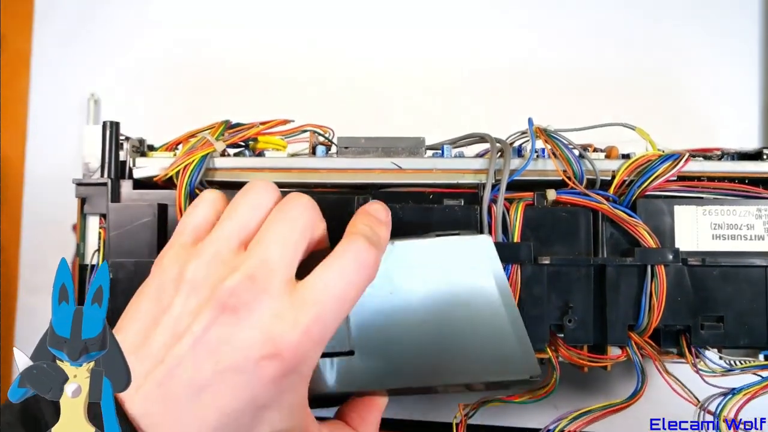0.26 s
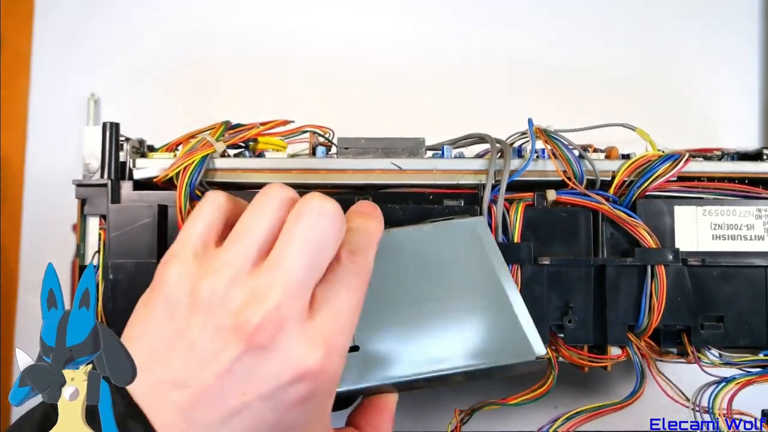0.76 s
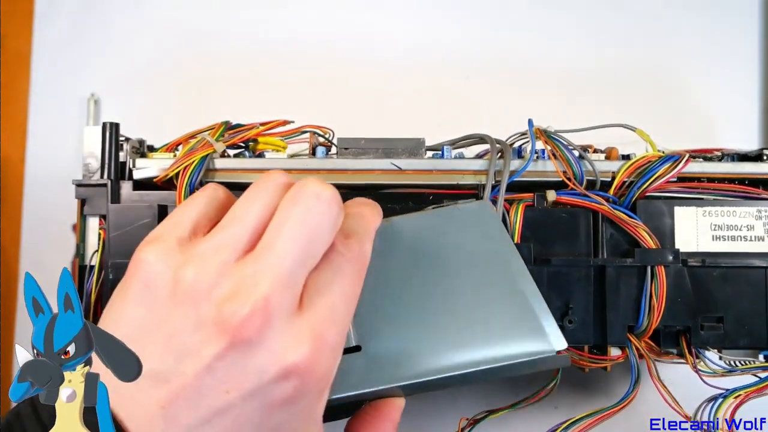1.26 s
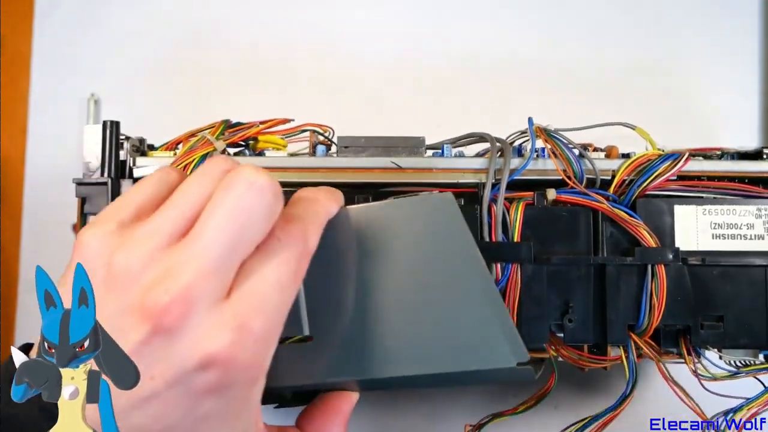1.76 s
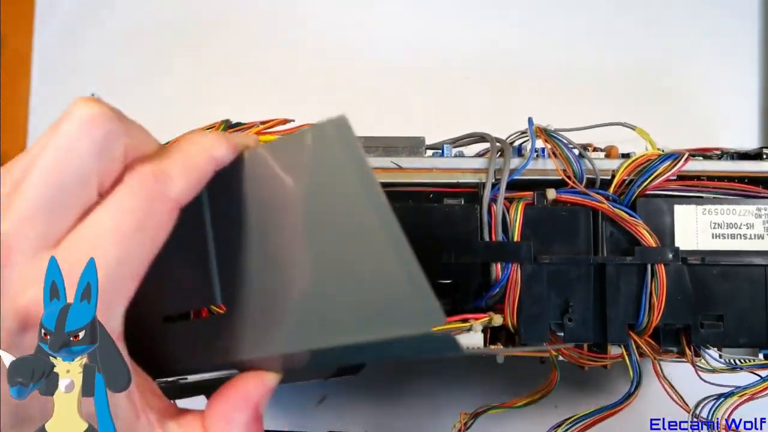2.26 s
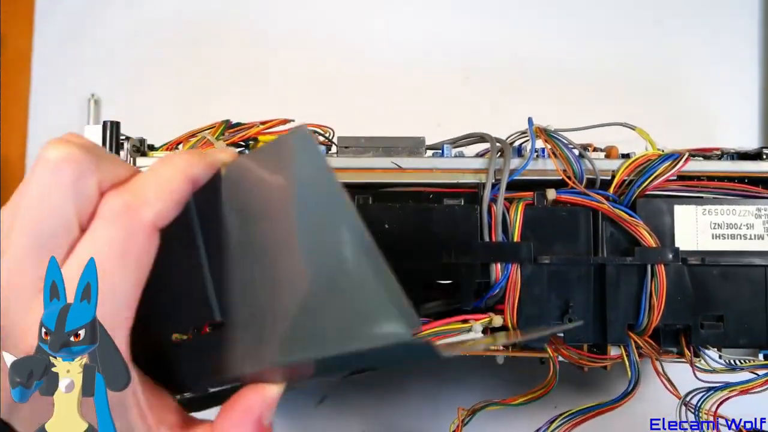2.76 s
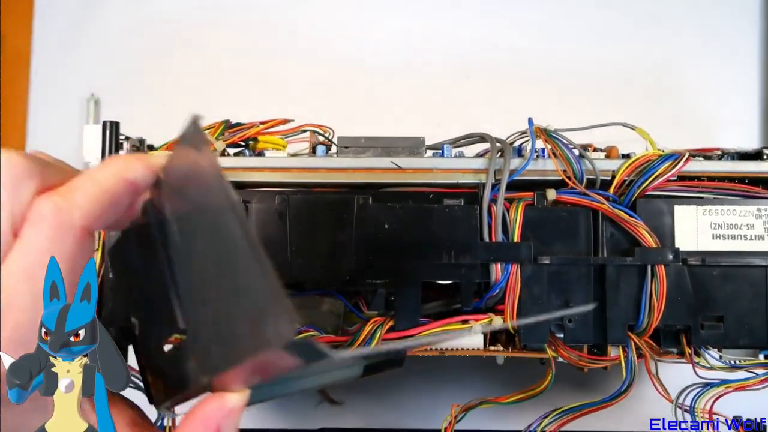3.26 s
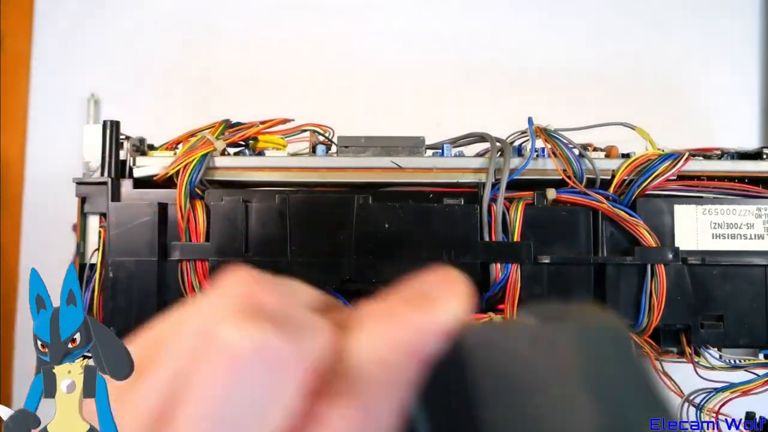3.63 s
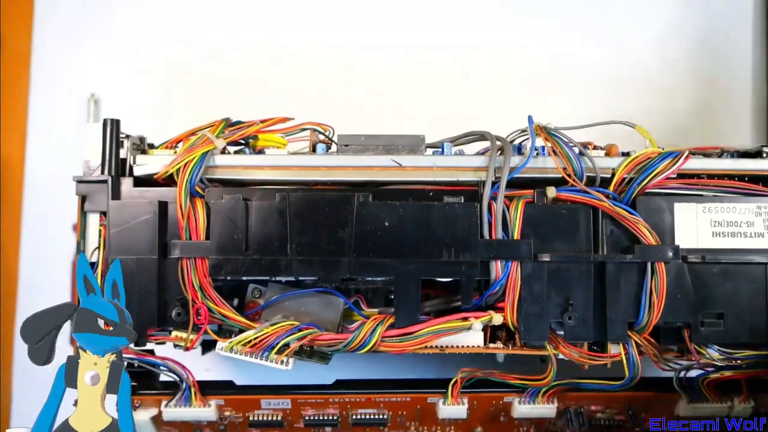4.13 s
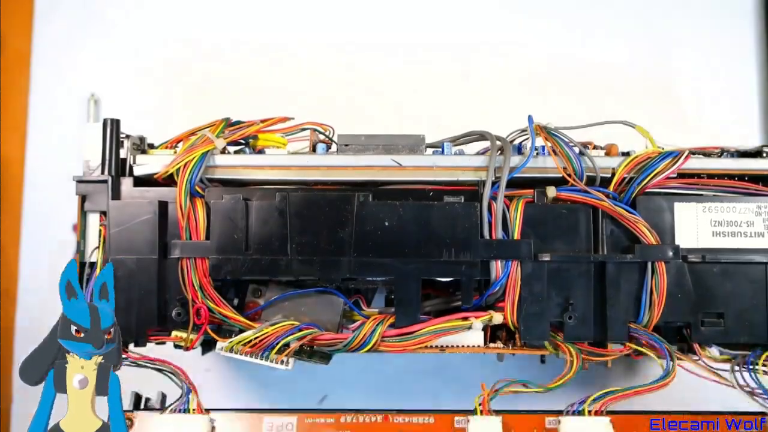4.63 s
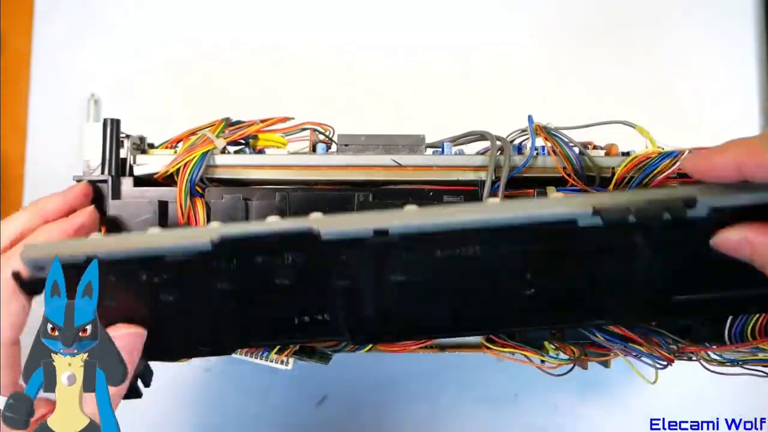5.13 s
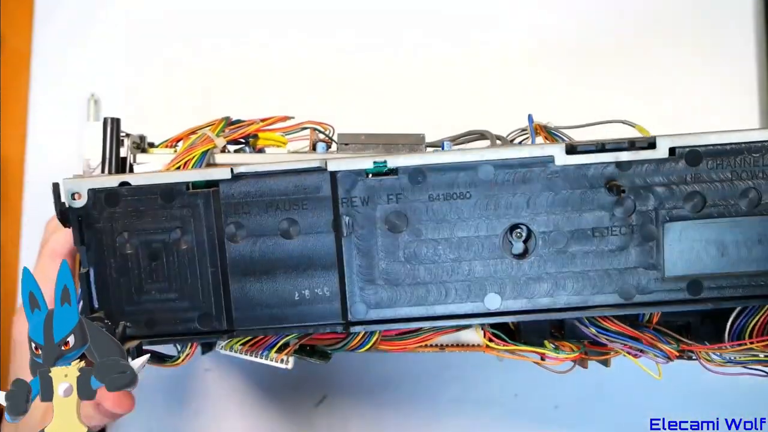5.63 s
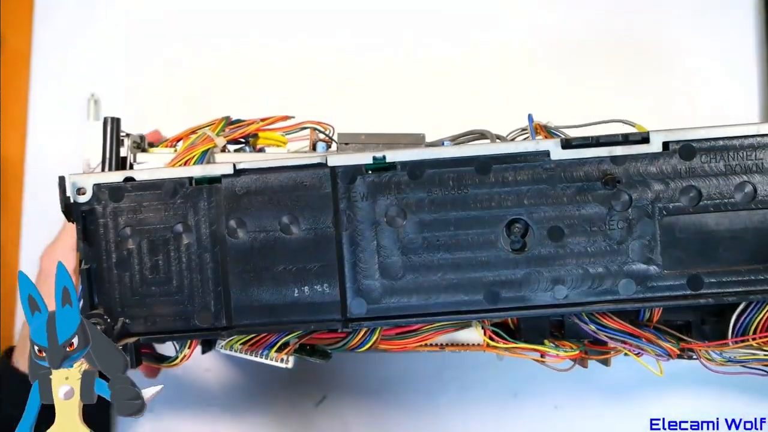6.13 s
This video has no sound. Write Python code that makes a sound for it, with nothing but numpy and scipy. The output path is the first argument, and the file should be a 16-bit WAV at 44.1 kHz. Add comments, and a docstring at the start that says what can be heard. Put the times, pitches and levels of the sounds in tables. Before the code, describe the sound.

Close stereo pickup in a small quiet room. Hard hollow plastic knocks and dry rubbing come in uneven clusters, with low bumps of the chassis on the table. They thin to faint ticks, then a metal cover pulls free with a bright short ring. After a brief lull it scrapes and clatters loudly over the table, followed by soft plastic knocks and a faint metallic tinkle.

```python
"""Plastic parts knock and rub from the start: a hand works a metal cover off a plastic chassis.
The cover drags free with a ring, is set down and slid over the table; a plastic panel is swung up.
Knocks: band-noise bursts plus shell and rib modes. Cover: impulses or friction driving sheet modes.
Rubs and scrapes: random slips shaping noise. Chassis: low modes. Room tail and faint air noise
surround it; a noise gate lowers the pauses."""
import sys
import numpy as np
from scipy import signal
from scipy.fft import rfft, irfft, next_fast_len
from scipy.io import wavfile
from scipy.ndimage import uniform_filter1d, minimum_filter1d, map_coordinates

SR = 44100
rng = np.random.default_rng(int(sys.argv[2]) if len(sys.argv) > 2 else 0)


def persist_wave(psi):
    """Save psi, clipped to +-1, as 16-bit WAV."""
    counts = np.round(np.clip(psi, -1, 1) * 32767).astype(np.int16)
    wavfile.write(sys.argv[1], SR, np.atleast_2d(counts).T)


N = 281754
TIME_S = np.arange(N) / SR

# quiet air spectrum: hz, relative_db
AIR_SPECTRUM = [(15, -33), (30, -11), (55, -3), (110, -11.5), (210, -9.5), (350, -9.5), (550, -14),
                (950, -16), (1800, -18), (2200, -17.5), (3200, -22), (6000, -29), (10000, -34.5),
                (16000, -50.5)]
# room decay: hz, t60_s
ROOM_DECAY = [(100, 0.21), (300, 0.34), (800, 0.22), (2000, 0.25), (5000, 0.15), (14000, 0.16)]
# likeness of noise at the two microphones: hz, correlation (0-1)
MIC_LIKENESS = [(50, .95), (250, .95), (1000, .8), (2500, .35), (8000, .45)]
# stereo balance: hz, left_minus_right_db
MIC_BALANCE = [(30, -7.5), (70, -9), (180, -1), (500, -0.5), (1200, -1.5), (4000, -3.5), (12000, -0.5)]
# position of the hand: time_s, left_lag_ms
HAND_LAG = [(0, 0), (1.5, 0), (1.8, -.1), (3.3, -.09), (4.0, .25), (4.8, .23), (5.1, .15), (5.45, .14),
            (5.6, 0)]
# low modes of the chassis on the table, before random detuning: hz, relative_db, t60_s
CHASSIS_MODES = [(54, -1, 0.13), (85.2, -16.5, 0.099), (106.2, -0.5, 0.25), (129, -3, 0.14), (178, 1, 0.1)]
# chassis rocking on the table: start_s, strength_db
CHASSIS_BUMPS = [(0.023, -14), (0.21, -4.5), (0.414, -1.5), (0.55, -3.5), (0.891, -20.5), (1.632, -13),
                 (2.187, -7), (2.655, -13.5), (2.898, -8), (3.233, -10.5), (3.523, -12.5), (4.089, -8),
                 (4.284, -8), (4.447, -5.5), (5.181, -7), (5.533, -13), (6.093, -17.5), (6.168, -12)]
# plastic rubbing under the hand: start_s, length_s, level_db, rumble_db (re level)
RUB_STROKES = [(0.0, .33, -39, -4.5), (0.41, .17, -36, 1), (0.795, 0.2, -35.5, -3),
               (1.154, 0.12, -42.5, -3.5), (1.561, 0.46, -40.5, -7), (2.37, 0.1, -32, -10),
               (2.66, .26, -44.5, -6), (3.521, 0.071, -51.5, -0.5), (4.476, .08, -38.5, -10),
               (4.695, 0.3, -40, -9), (5.025, 0.2, -35.5, -10), (5.452, 0.18, -44, -2),
               (5.74, .34, -63, -6.5), (6.09, .14, -46.5, -7)]
# rubbing spectrum: hz, relative_db
RUB_SPECTRUM = [(15, -36.5), (40, -7), (90, -6), (180, -7), (350, -9), (650, -8.5), (1020, -2),
                (1500, -8.5), (2500, -12.5), (5000, -20.5), (8000, -26.5), (11500, -36.5), (16000, -45)]
# shell modes excited by rubbing: hz, relative_db, t60_s
RUBBED_SHELL_MODES = [(954, 6, 0.018), (1077, -6.5, 0.08), (1103, -19.0, 0.012)]
# cover edge dragged out of the chassis: start_s, length_s, level_db, rumble_db, hiss_db (both re level)
PULL_STROKE = (2.945, .145, -34, -6, 5)
# cover pushed over the table, then nudged: start_s, length_s, level_db, rumble_db, hiss_db (both re level)
SLIDE_STROKES = [(4.014, .305, -19.5, -5, -11.5), (4.42, .14, -36, -8, -12)]
# metal scraping spectrum: hz, relative_db
SCRAPE_SPECTRUM = [(15, -39), (35, -25.5), (55, 4), (85, -9.5), (140, -19), (350, -7), (600, -14),
                   (1280, -10.5), (2060, -17), (4000, -16), (8000, -22.5), (12000, -32), (16000, -53)]
# drive of the sheet by its sharp edge: hz, gain_db
EDGE_DRIVE = [(350, -6.0), (1500, -4), (5000, 12.5)]
# small metal part in the panel: hz, relative_db, t60_s
TINKLE_MODES = [(3330, -7, .35), (5700, -3, .35), (5790, 0, .45), (5870, -1, .4), (6010, -3, .35)]
# knocks that set it ringing: start_s, level_db
TINKLE_HITS = [(5.126, -15), (5.421, -13)]
# cover held in the hand: hz, relative_db, t60_s
HELD_MODES = [(320.3, -4, 0.51), (433, -14, 0.37), (1070, -6.5, 0.28), (1334, 1.5, 0.083),
              (1750, -15, 0.069), (2173, 8, 0.23), (2286, 1, 0.2), (2400, -5, .23), (2767, 3.5, 0.23),
              (3400, 5.5, .08), (4530, 11, 0.05), (6360, 6, .12), (6800, -9, 0.15), (7300, -12.5, .16)]
# cover lying on the table: hz, relative_db, t60_s
LAID_MODES = [(258, -6.5, 0.068), (284, -9.5, 0.14), (344, -6.5, 0.98), (379, -10, 0.119),
              (442.4, -3.5, 0.42), (419, -3, 0.068), (564.4, -8, 0.26), (703, -4, 0.1), (810, -1.5, .12),
              (980, -1.5, 0.14), (1258, 5, 0.1), (1380, 1.5, 0.11), (1730, -6, 0.2), (1980, -7.5, 0.4),
              (2416, -3.5, 0.17), (2931, -9.5, 0.27), (3180, -11.5, .22), (3960, -22, .22),
              (4100, -16, 0.16), (5000, -17.5, .22), (5250, -11.5, 0.223)]
# blows on the cover: start_s, strength_db, weight_db (low tilt), snap_db (high tilt)
COVER_BLOWS = [(2.994, -9.5, -3, 4), (3.006, -12.5, -0.5, -9), (3.025, -13, -4, 11.5), (3.053, -26, -1, 2),
               (3.074, -19, 3, 10), (3.232, -17.5, -0.5, 13.5), (3.245, -19, 4.5, 2.5),
               (3.895, -20, 8.5, -1), (4.011, -5, -9, -3), (4.046, -5, 4, 5.5), (4.089, -6, 9.5, -15.5),
               (4.141, -2.5, -3.5, 2), (4.176, -0.5, -6, 0), (4.197, -1.5, 3, 1),
               (4.283, -12.5, 15.5, -0.5), (4.306, -4, -10, 4.5), (4.414, -6, -10, -5),
               (4.449, -10, 10, -14), (4.498, -17, -10, 2.5), (4.554, -18.5, -19, 0.5)]
# plastic knocks: start_s, strength_db, weight_db (low tilt), snap_db (high tilt), shell_hz, t60_s (burst, at 1 kHz)
PLASTIC_KNOCKS = [(0.022, -12.5, -3.5, -1.5, 1356, 0.052), (0.084, -21.5, -7, 4, 945, 0.038),
                  (0.202, -12.0, -5, -0.5, 1510, 0.12), (0.209, -5, 3, 1, 1330, 0.17),
                  (0.232, -15.5, 7.5, -12, 820, 0.043), (0.286, -21.0, -9.5, 4.5, 2040, 0.28),
                  (0.364, -9, -6, 0, 1058, 0.024), (0.413, -15.0, 1.5, -2.5, 967, 0.24),
                  (0.549, -12, -3, -7.5, 1124, 0.08), (0.704, -24.5, 9.5, -8, 910.0, 0.089),
                  (0.714, -17, -5.0, -3.0, 940, 0.39), (0.737, -11, 3, -3.5, 1110.0, 0.47),
                  (0.764, -8, 2, -4.5, 1380, 0.062), (0.771, -3.5, 0, -1, 1073, 0.26),
                  (0.793, -3.5, 1.5, -3, 1750.0, 0.086), (0.892, -13, 6.5, -1, 1340, 0.18),
                  (0.915, -17.5, 8.5, -7, 980.0, 0.031), (0.969, -22, 4.5, -4, 1170, 0.028),
                  (1.12, -7.0, -3, 0.5, 1108, 0.03), (1.179, -27.5, 0, 5.5, 1056, 0.045),
                  (1.47, -4, -3.5, -4.5, 974, 0.13), (1.485, -14, -12, 6, 1347, 0.024),
                  (1.506, -20.0, 4.5, 3, 1340, 0.19), (1.663, -13.5, 1.5, -1, 1720, 0.096),
                  (1.721, -21.5, -17, 4, 1045, 0.17), (1.767, -18.5, -12.5, 2, 980.0, 0.065),
                  (1.847, -19.5, -3.5, -15.0, 1100.0, 0.46), (1.902, -18.5, -2, -4.5, 1040, 0.24),
                  (1.952, -25.5, -2, 5, 900, 0.056), (2.01, -36.5, -11, 12.5, 965, 0.024),
                  (2.188, -17.5, 1.0, -5, 1197, 0.24), (2.35, -22.0, -4.0, -3.5, 1015, 0.13),
                  (2.447, -18.5, -7.5, 4, 1020, 0.14), (2.634, -24, 4, 1.5, 1270, 0.11),
                  (2.655, -25.5, -13, 0.5, 982.0, 0.19), (2.705, -43.5, -4, 22, 1270, 0.05),
                  (2.781, -24, -1, 4, 970, 0.24), (2.871, -18, -0.5, -9, 1370, 0.17),
                  (2.938, -11.5, -3.0, 2, 1004, 0.42), (4.684, -21.5, -4, -6, 918, 0.43),
                  (4.765, -24.5, -18.5, 7.5, 948, 0.049), (4.956, -38.5, 0, 12.5, 937.0, 0.05),
                  (5.042, -19, -15.5, 7.5, 934, 0.15), (5.102, -20.5, -20, 7, 896, 0.14),
                  (5.128, -18, -11.5, 3.5, 1015, 0.09), (5.183, -12.5, 0.5, -18, 1232, 0.038),
                  (5.422, -19.0, -2, -8, 1060, 0.17), (5.441, -22.5, -15, 0.5, 1252, 0.19),
                  (5.532, -20, 3.5, 4, 1396, 0.16), (5.604, -26.5, -29.5, -12, 1168, 0.051),
                  (6.092, -27.5, 6.5, 3, 828, 0.12), (6.17, -23.5, 0, -8, 2270, 0.15),
                  (6.378, -23.5, 4, -7.5, 1023, 0.11)]
# contact spectrum: hz, gain_db
KNOCK_SPECTRUM = [(60, -2), (200, 0.5), (330, 8.5), (480, 9), (700, 7), (1200, 8), (1900, 4), (3200, 0.5),
                  (5000, -5), (6500, -3), (8200, -14.5), (11500, -16.5), (16000, -48)]

# contact noise bands: centre_hz, width_hz, filter
EDGES_HZ = np.geomspace(170, 17000, 11)
BANDS = [
    (np.sqrt(lo * hi), hi - lo, signal.butter(2, [lo, hi], "band", fs=SR, output="sos"))
    for lo, hi in zip(EDGES_HZ, EDGES_HZ[1:])
]


def amp(db):
    """Decibels to gain."""
    return 10 ** (np.asarray(db) / 20)


def unit(x):
    """Scales to a mean energy of one per channel."""
    return x / np.sqrt(np.mean(np.sum(x ** 2, -1)) + 1e-20)


def evened(x):
    """Scales to an rms of one over all channels."""
    return x / np.sqrt(np.mean(x ** 2) + 1e-20)


def read(points, hz):
    """Interpolates a table on a log-frequency axis."""
    table_hz, value = np.transpose(points)
    return np.interp(np.log(hz + 1), np.log(table_hz + 1), value)


def add(mix, start_s, sound):
    """Mixes a stereo sound in at start_s."""
    part = mix[:, max(round(start_s * SR), 0):][:, :sound.shape[1]]
    part += sound[:, :part.shape[1]]


def colour(x, points):
    """Minimum-phase spectrum filter: causal, so attacks stay sharp."""
    log_gain = np.log(amp(read(points, abs(np.fft.fftfreq(8192, 1 / SR)))))
    taps = np.fft.ifft(np.exp(signal.hilbert(log_gain).conj())).real[:4096]
    if x.ndim > 1:
        taps = taps[None]
    return signal.oaconvolve(x, taps, axes=-1)[..., :x.shape[-1]]


def noise_pair(size):
    """White noise, partly alike in the two microphones."""
    padded = next_fast_len(size, True)
    a, b = rfft(rng.standard_normal((2, padded)))
    same = np.clip(read(MIC_LIKENESS, np.fft.rfftfreq(padded, 1 / SR)), 0, .95)
    right = same * a + np.sqrt(1 - same ** 2) * b
    return irfft(np.array([a, right]), padded)[:, :size]


def ring(x, modes, spread_ms=0.19):
    """Drives decaying sine modes with x; each has its own small delay at each microphone."""
    t = np.arange(SR // 2) / SR
    delays_s = rng.uniform(-1, 1, (len(modes), 2, 1)) * spread_ms / 1000
    signs = rng.choice([-1, 1], (len(modes), 1, 1))
    body = 0
    for (hz, db, t60_s), delay_s, sign in zip(modes, delays_s, signs):
        body = body + sign * amp(db - 60 * t / t60_s) * np.sin(2 * np.pi * hz * (t - delay_s))
    return signal.fftconvolve(x, body, axes=1)[:, :x.shape[1]]


def strike(modes):
    """One impulse sets the modes ringing."""
    tap = np.tile(signal.unit_impulse(SR), (2, 1))
    return unit(ring(tap, modes))


def air(level_db=-59):
    """Quiet room air: steady coloured noise."""
    return amp(level_db) * evened(colour(noise_pair(N), AIR_SPECTRUM))


def room(x, wet_db=-12):
    """Small room: dense tail, alike at both microphones in the bass, decay set per frequency."""
    hz, t, z = signal.stft(rng.standard_normal((2, SR // 2)), SR, nperseg=256)
    same = 1 / (1 + (hz[:, None] / 800) ** 2)
    z = np.array([z[0], same * z[0] + np.sqrt(1 - same ** 2) * z[1]])
    decay = amp(-60 * t / read(ROOM_DECAY, hz)[:, None])
    tail = signal.istft(z * decay, SR, nperseg=256)[1]
    tail_s = np.arange(tail.shape[1]) / SR
    tail = unit(tail * (1 - np.exp(-(tail_s / 0.0083) ** 2)))  # soft onset
    return x + amp(wet_db) * signal.fftconvolve(x, tail, axes=1)[:, :N]


def thud(db, level_db=3, rise_s=0.0017):
    """The push of a blow rocks the chassis: low modes, detuned a little each time."""
    t = np.arange(SR // 3) / SR
    count = len(CHASSIS_MODES)
    phases = rng.random((count, 1, 1)) + rng.normal(0, .08, (count, 2, 1))  # cycles
    detunes = rng.uniform(.92, 1.08, count)
    rock = 0
    for (hz, mode_db, t60_s), detune, phase in zip(CHASSIS_MODES, detunes, phases):
        rock = rock + amp(mode_db - 60 * t / t60_s) * np.sin(2 * np.pi * (hz * detune * t + phase))
    return amp(db + level_db) * unit(rock * (1 - np.exp(-t / rise_s)))


def rocking(nudge_db=-13):
    """Firm pushes bump the chassis on the table; every plastic knock nudges it a little."""
    out = np.zeros((2, N))
    for start_s, db in CHASSIS_BUMPS:
        add(out, start_s, thud(db))
    for start_s, db, *_ in PLASTIC_KNOCKS:
        add(out, start_s, thud(db + nudge_db))
    return out


def friction(strokes, attack_s, release_t60_s, spectrum, slips_per_s, spread_db, smooth, slip_s):
    """Tiny uneven slips shape noise into rub, rumble and hiss; strokes swell, hold and die away."""
    sizes = np.minimum(rng.exponential(1, N), 3.5)
    slips = amp(spread_db * sizes) * (rng.random(N) < slips_per_s / SR)
    grip = evened(signal.lfilter([1], [1, -np.exp(-1 / (slip_s * SR))], slips))
    hz, _, grains = signal.stft(noise_pair(N) * (grip + smooth), SR, nperseg=1024)
    hz = hz[:, None]

    # as the point of contact wanders, different resonances come and go
    patches = uniform_filter1d(rng.standard_normal(grains.shape[1:]), size=4, axis=0)
    patches = evened(uniform_filter1d(patches, size=4, axis=1))
    wander_db = 3.5 * patches * hz / (hz + 500)
    grains = grains * amp(read(spectrum, hz) + wander_db)

    low = 1 / (1 + (hz / 420) ** 4)
    high = 1 - 1 / (1 + (hz / 3100) ** 6)
    shares = (1 - low - high, low, high)
    rub, rumble, hiss = [evened(signal.istft(grains * share, SR)[1][:, :N]) for share in shares]

    out = np.zeros((2, N))
    for start_s, length_s, db, rumble_db, hiss_db in strokes:
        on = (TIME_S >= start_s) & (TIME_S < start_s + length_s + release_t60_s)
        t = TIME_S[on] - start_s
        fade_db = -60 * np.maximum(t - length_s, 0) / release_t60_s
        touch = np.minimum(t / attack_s, 1) * amp(db + fade_db)
        out[:, on] += touch * (rub[:, on] + amp(rumble_db) * rumble[:, on] + amp(hiss_db) * hiss[:, on])
    return out


def rubbing(shell_db=-9, hiss_db=-10.5):
    """Parts creep over each other and excite the shell; larger slips are heard as small ticks."""
    strokes = [(*row, hiss_db) for row in RUB_STROKES]
    rub = friction(strokes, attack_s=0.0064, release_t60_s=0.28, spectrum=RUB_SPECTRUM,
                   slips_per_s=500, spread_db=5, smooth=.45, slip_s=.002)
    shell = ring(rub, RUBBED_SHELL_MODES)
    return rub + amp(shell_db) * rub.std() * evened(shell)


def tinkling():
    """A small metal part rings on faintly as the panel is swung up."""
    out = np.zeros((2, N))
    for start_s, db in TINKLE_HITS:
        add(out, start_s, amp(db) * strike(TINKLE_MODES))
    return out


def pulling(metal_db=-4):
    """The cover's edge catches on the chassis as it comes free, and the friction makes the sheet sing."""
    scrape = friction([PULL_STROKE], attack_s=0.091, release_t60_s=0.055, spectrum=SCRAPE_SPECTRUM,
                      slips_per_s=350, spread_db=5, smooth=.25, slip_s=.002)
    return scrape + amp(metal_db) * scrape.std() * evened(ring(scrape, HELD_MODES))


def sliding(metal_db=-5):
    """The cover's edge judders over the table and keeps the sheet ringing."""
    scrape = friction(SLIDE_STROKES, attack_s=.012, release_t60_s=.19, spectrum=SCRAPE_SPECTRUM,
                      slips_per_s=600, spread_db=4, smooth=.5, slip_s=.003)
    bite = colour(scrape, EDGE_DRIVE)  # drives the high modes hardest
    return scrape + amp(metal_db) * scrape.std() * evened(ring(bite, LAID_MODES))


def blow(weight_db, snap_db, t60_s, bass_slowness=0.049, crack_db=3, crack_t60_s=0.02):
    """Contact burst: a crack plus a decay in noise bands, the low bands lasting slightly longer."""
    t = np.arange(SR // 4) / SR
    noise = noise_pair(len(t))
    out = 0
    tilt = [(400, weight_db), (850, 0.025), (1500, 0), (5000, snap_db)]  # hz, gain_db
    for hz, width_hz, sos in BANDS:
        band_t60_s = max(t60_s, .004) * (1000 / hz) ** bass_slowness
        fade = amp(-60 * t / band_t60_s) + amp(crack_db - 60 * t / crack_t60_s)
        band = unit(signal.sosfilt(sos, noise * fade))
        out = out + band * np.sqrt(width_hz / 1000) * amp(read(tilt, hz))
    return colour(out, KNOCK_SPECTRUM)


def clanks(level_db=12, hard_db=-7, contact_t60_s=0.15, sheet_db=1, laid_s=3.6):
    """Blows ring the sheet: soft ones favour its low modes; the modes change once it is laid down."""
    out = np.zeros((2, N))
    for start_s, db, weight_db, snap_db in COVER_BLOWS:
        hardness = [(450, 0), (2500, min(snap_db + hard_db, 0))]  # hz, gain_db
        cover = HELD_MODES if start_s < laid_s else LAID_MODES
        modes = [(hz, mode_db + read(hardness, hz), t60_s) for hz, mode_db, t60_s in cover]
        add(out, start_s, amp(db + level_db) * blow(weight_db, snap_db, contact_t60_s))
        add(out, start_s, amp(db + level_db + sheet_db) * strike(modes))
    return out


def shell_ring(hz, ring_t60_s=0.046, rise_s=0.00019):
    """The hollow shell: one short decaying sine at a pitch set by the spot that is hit."""
    t = np.arange(SR // 4) / SR
    return unit(np.sin(2 * np.pi * hz * t) * amp(-60 * t / ring_t60_s) * (1 - np.exp(-t / rise_s)))


def rib_ring(t60_s=.05):
    """Thin ribs: eight scattered high modes, uneven in level between the microphones."""
    t = np.arange(SR // 4) / SR
    hz = np.geomspace(1700, 10500, 8)[:, None, None] * rng.uniform(.87, 1.13, (8, 1, 1))
    gains = rng.normal(1, .5, (8, 2, 1)) * amp(read(KNOCK_SPECTRUM, hz))
    ribs = (gains * np.sin(2 * np.pi * hz * t)).sum(0)
    return unit(ribs * amp(-60 * t / t60_s))


def knocks(level_db=14, rib_db=-3, shell_db=-0.5, damping_db_per_db=.5):
    """Plastic contacts ring shell and ribs; a light touch leaves the shell free, a heavy one damps it."""
    out = np.zeros((2, N))
    for start_s, db, weight_db, snap_db, shell_hz, t60_s in PLASTIC_KNOCKS:
        shell = amp(shell_db - damping_db_per_db * weight_db) * shell_ring(shell_hz)
        ribs = amp(rib_db + snap_db / 2) * rib_ring()
        contact = blow(weight_db, snap_db, t60_s)
        add(out, start_s, amp(db + level_db) * (contact + shell + ribs))
    return out


def scene():
    """All handling, placed between the microphones by delay and balance, in a quiet room."""
    left, right = rocking() + rubbing() + tinkling() + pulling() + sliding() + clanks() + knocks()
    lag_samples = np.interp(TIME_S, *np.transpose(HAND_LAG)) * SR / 1000
    left = map_coordinates(left, [np.arange(N) - lag_samples], order=3)
    left, right = room(np.array([left, right])) + air()
    left = colour(left, [(hz, db / 2) for hz, db in MIC_BALANCE])
    right = colour(right, [(hz, -db / 2) for hz, db in MIC_BALANCE])
    return np.array([left, right])


def record(dry, gate_db=-52, depth_db=9, knee_db=3, cut_hz=16100):
    """A noise gate lowers the pauses; peaks clip; a low-pass limits the band."""
    power_db = 10 * np.log10(abs(uniform_filter1d((dry ** 2).mean(0), size=600)) + 1e-12)
    held_db = -minimum_filter1d(-power_db, size=1500)  # running maximum
    shut = uniform_filter1d(np.clip((gate_db - held_db) / knee_db, 0, 1), size=500)
    out = np.clip(dry * amp(-depth_db * shut), -1, 1)
    low_pass = signal.firwin(255, cut_hz, window=("kaiser", 9), fs=SR)
    return signal.oaconvolve(out, low_pass[None], "same")


dry = scene()
out = record(dry)
persist_wave(out)
```